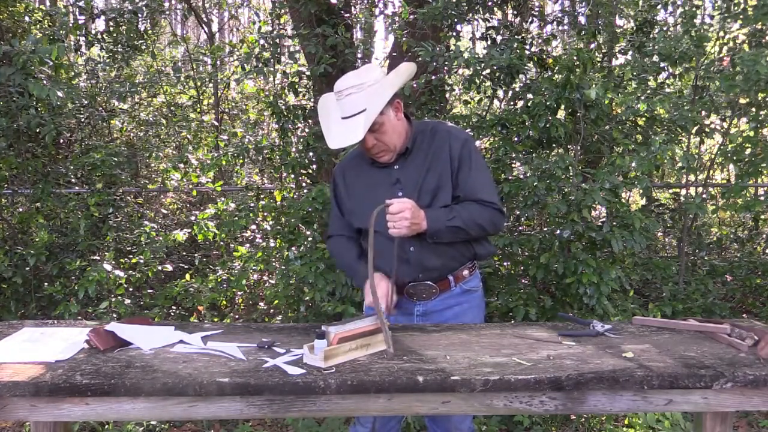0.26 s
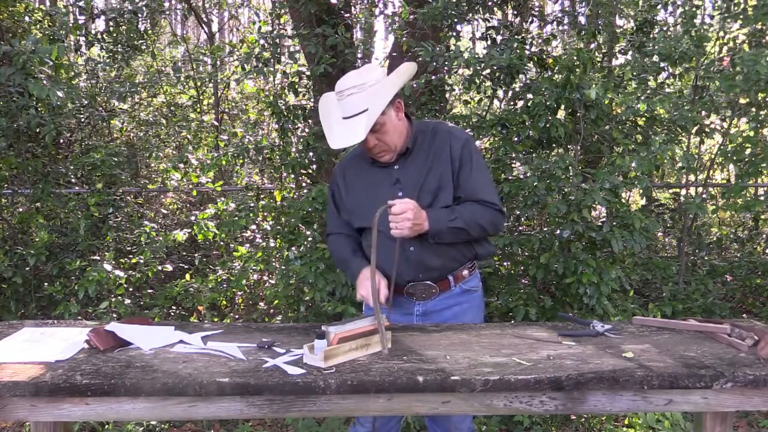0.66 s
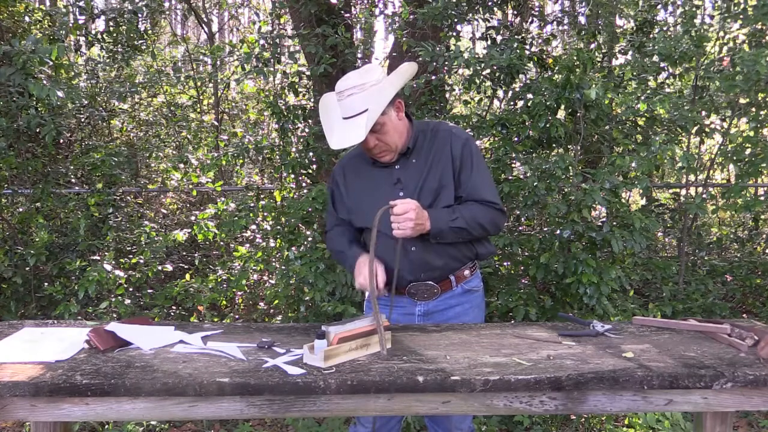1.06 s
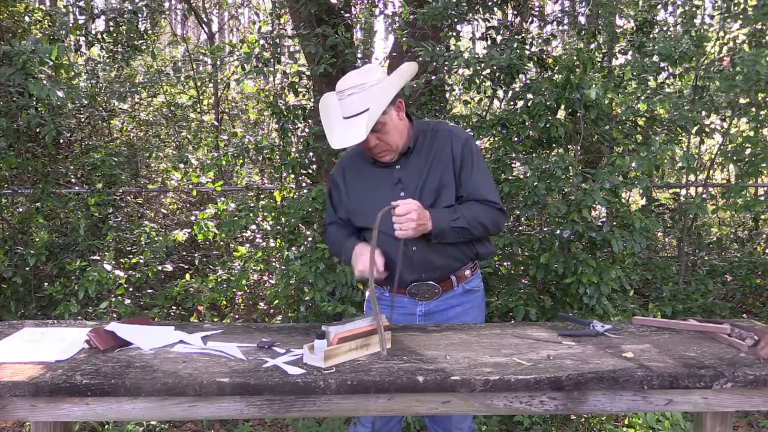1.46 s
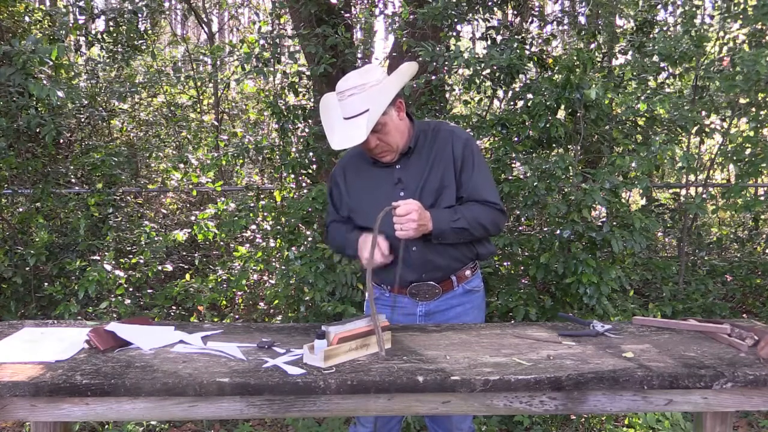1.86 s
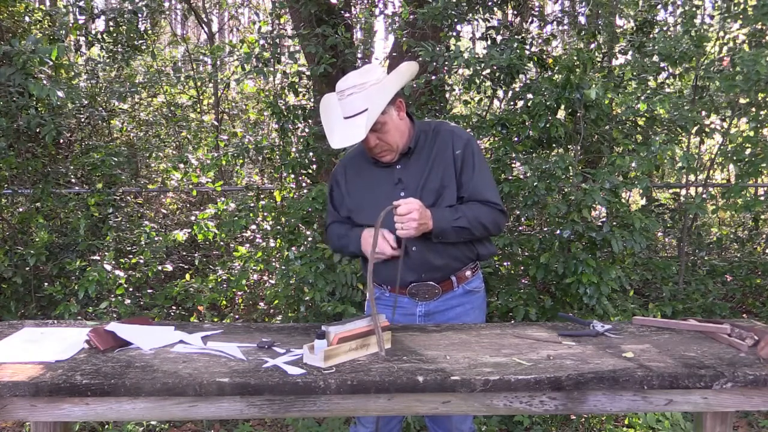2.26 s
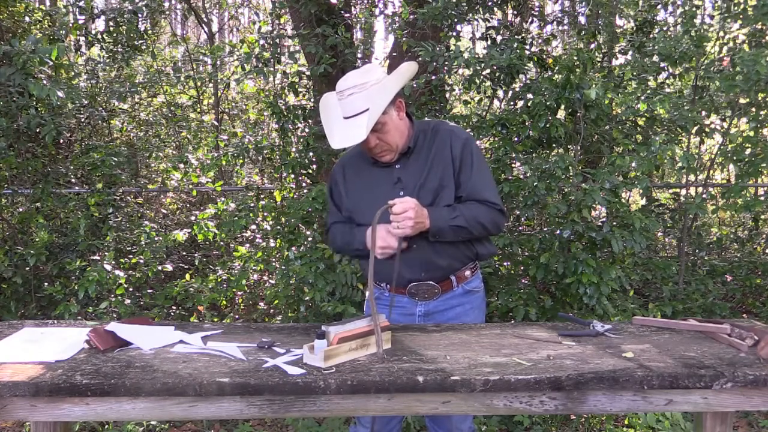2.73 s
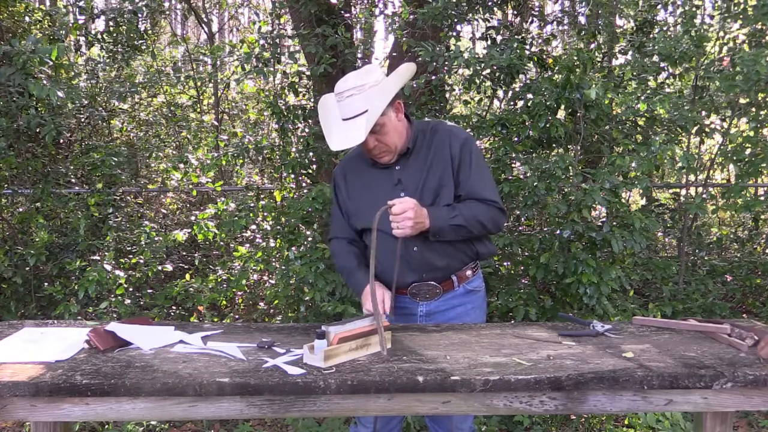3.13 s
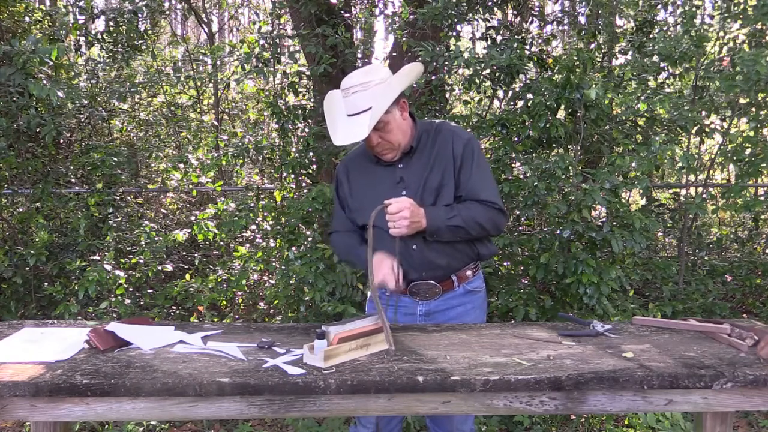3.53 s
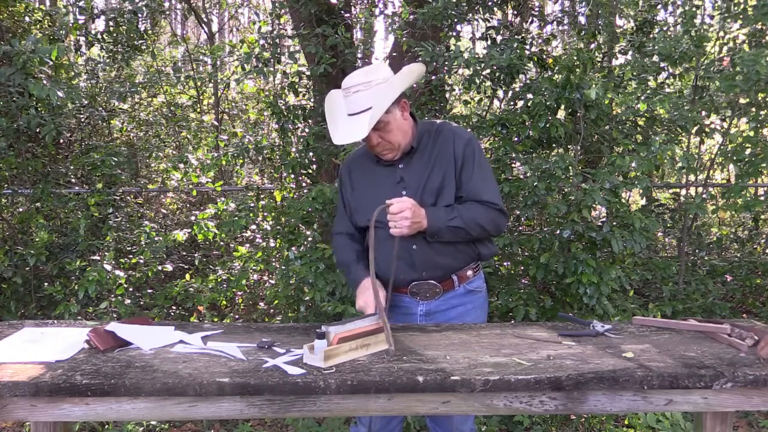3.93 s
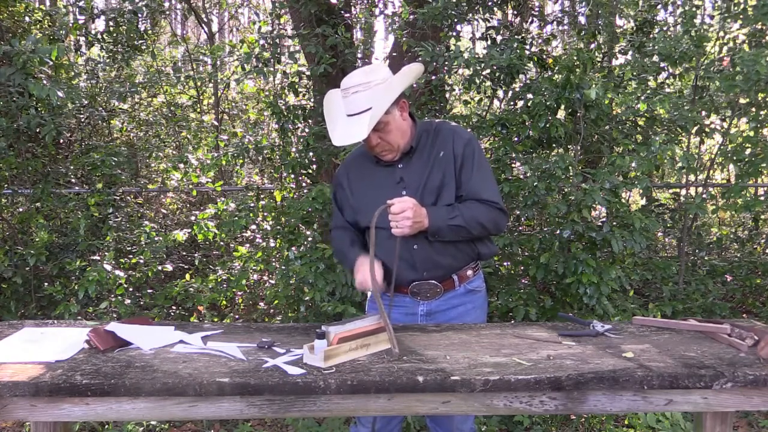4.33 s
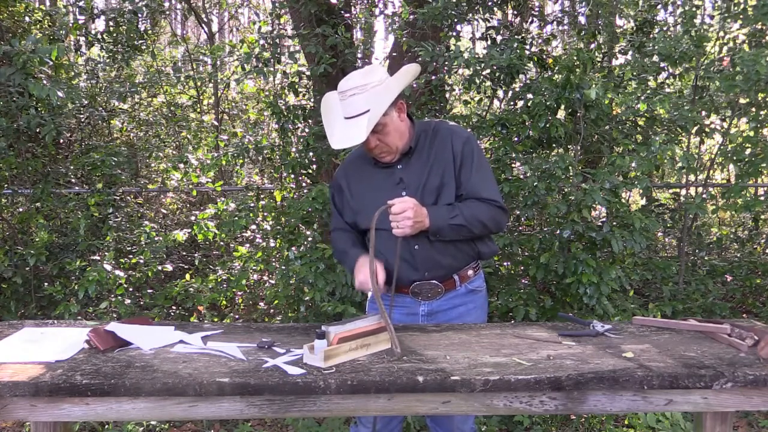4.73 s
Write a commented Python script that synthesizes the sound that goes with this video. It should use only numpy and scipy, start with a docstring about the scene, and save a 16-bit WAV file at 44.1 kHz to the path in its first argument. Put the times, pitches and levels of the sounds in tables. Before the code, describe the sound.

Quick hissing knife strokes on taut leather, with crisp slaps at the turns and faint birdsong behind.

```python
"""Stropping a knife by a wood

A blade hisses along a taut leather strap and slaps it at each turn; the strap tugs a wooden bench.
Birds sing among echoing trees, over leaf hiss and a low drone. The small microphone is lopsided:
each loud treble burst shifts its rest point and comes out as a soft thump."""
import sys
import numpy as np
from scipy import signal
from scipy.fft import rfft, irfft
from scipy.io import wavfile
from scipy.ndimage import uniform_filter1d

SR = 44100
rng = np.random.default_rng(int(sys.argv[2]) if len(sys.argv) > 2 else 0)


def persist_wave(psi):
    """Save psi, clipped to +-1, as 16-bit WAV."""
    counts = np.round(np.clip(psi, -1, 1) * 32767).astype(np.int16)
    wavfile.write(sys.argv[1], SR, np.atleast_2d(counts).T)


N = 220279

# blade meets strap: t/s, level of first 4 ms/dB, bright resonance/Hz, chatter/ms
CONTACTS = [(0.3096, -64, 3760, 2.6), (0.3621, -52, 1750, 1.1), (0.4929, -31, 3600, 3.5),
            (0.82, -53, 1690, 0.89), (0.9543, -27, 4900, 2.7), (1.264, -52.5, 1650, 0.75),
            (1.3609, -26.5, 2800, 1.9), (1.7407, -53.5, 2730, 3), (1.8361, -27, 6050, 4.15),
            (2.15, -55.5, 3780, 2.7), (2.179, -39, 5500, 6.7), (2.1848, -49, 3120, 2.3),
            (2.3212, -37.5, 2610, 3.5), (2.6076, -54, 1630, 1.4), (2.696, -26, 2820, 3),
            (2.836, -49, 1600, 3.2), (2.8461, -43.5, 3300, 5.2), (2.851, -41.5, 2750, 1.5),
            (3.6277, -25.5, 2700, 3.2), (4.0893, -58, 2400, 1.8), (4.507, -54.5, 4300, 1),
            (4.8938, -51.5, 4300, 1.9)]


def strokes():
    """Stick-slip: the edge hisses, the leather answers lower and squeaks at lift-off."""
    # resonances of leather and edge: f/Hz, width/Hz, level/dB
    leather_modes = [(1322, 500, -3), (1680, 300, 1.5), (2630, 310, -2), (3283, 960, 1.5), (3897, 700, -2),
                     (4606, 1000, -1.5)]
    edge_modes = [(5780, 1360, 0.5), (7630, 2100, 1.5), (9450, 1600, 9.5), (12200, 2200, -3.5),
                  (14800, 2600, -4.5)]
    hiss, body, squeak = pressure()
    slip = grains(spread_db=-1.5) * undb(0.97 * walk(120))
    drive = unit(slip)
    force = hiss / hiss.max() + 1e-9
    edge = 0
    for k, (hz, width, db) in enumerate(edge_modes):
        brightening = force ** (0.15 * np.log2(hz / 8000))  # higher modes need more pressure
        edge += (-1) ** k * undb(db + 1.9 * walk(40)) * ring(drive, hz, width) * brightening
    leather = sum(undb(db + 1.6 * walk(60)) * ring(slip, hz, width) for hz, width, db in leather_modes)
    return hiss * edge + body * unit(leather) + squeak * unit(ring(slip, hz=6630, width_hz=1280))


def pressure():
    """Each stroke swells, holds, fades and ends at lift-off. Returns hiss, body and squeak gains."""
    # blade passes: lift-off t/s, fade/s, hold/s, swell/s, hiss/dB, body re hiss/dB, squeak re hiss/dB
    passes = [(0.136, .037, 0.0066, .09, -53.5, 2.5, 2.5), (0.486, .004, 0.027, 0.077, -62.5, 4.5, -6),
              (0.622, 0.087, .012, .017, -63, -0.5, 5), (0.935, .008, 0.014, .098, -62.5, 5, -8),
              (1.07, 0.065, 0.04, 0.0044, -65.5, -2.5, -14), (1.35, .003, .006, 0.055, -69.5, 6.5, -20),
              (1.497, 0.072, 0.032, 0.0074, -59, -2.5, -17), (1.82, 0.0037, 0.005, 0.077, -62, 4.5, -1),
              (1.957, 0.075, .022, .03, -68, -4, -22), (2.309, 0.007, 0.086, 0.043, -66.5, 7.5, 1),
              (2.42, .035, .022, 0.023, -79, -2, -10), (2.68, .006, 0.019, 0.045, -69.5, 6.5, -3),
              (2.827, 0.068, .035, 0.02, -58, -3.5, -3), (3.603, 0.0053, 0.012, 0.043, -67.5, 3, 6),
              (3.803, 0.13, 0.013, 0.02, -53.5, -4.5, -2), (4.279, 0.0094, 0.063, 0.1, -57.5, 2.5, 5.5),
              (4.69, 0.047, 0.034, 0.11, -54, 2.5, 8), (5.0, .004, .008, 0.076, -66, 8.5, -1)]
    swell_db_per_s, fade_db_per_s, touch_s = 209, 270, 0.0041
    squeak_s, squeak_floor_db = 0.027, -8
    gains = np.zeros((3, N))
    for lift, fade, hold, swell, db, body_db, squeak_db in passes:
        left_s = np.arange(fade + hold + swell, 0, -1 / SR)
        gate = np.clip(np.minimum(left_s[0] - left_s, left_s) / touch_s, 0, 1)
        drop_db = swell_db_per_s * np.maximum(left_s - fade - hold, 0)
        drop_db += fade_db_per_s * np.maximum(fade - left_s, 0)
        body_drop_db = 0.65 * drop_db
        lift_db = np.interp(left_s, [squeak_s, 1.17 * squeak_s], [squeak_db, squeak_floor_db])
        for row, gain_db in zip(gains, (-drop_db, body_db - body_drop_db, lift_db - body_drop_db)):
            add(row, lift - left_s[0], gate * undb(db + gain_db))
    return gains


def slaps():
    """Impact and brief chatter ring the blade; softer contacts are duller."""
    # blade resonances: f/Hz, width/Hz, level/dB
    blade_modes = [(1175, 550, -13), (1760, 550, -6.5), (2800, 1550, 4.5), (4320, 1530, 5.5),
                   (5570, 3500, 6.5), (6270, 510, -19), (8020, 5900, -1.5), (9340, 2500, -16.5),
                   (11330, 460, -9), (13800, 720, -3.5), (15400, 500, -31)]
    soft_hard_db = [-46.5, -33.5]
    out, t = np.zeros(N), np.arange(1200) / SR
    noises = grains(spread_db=3.5, shape=(len(CONTACTS), len(t)))
    for (start, db, bright_hz, chatter_ms), noise in zip(CONTACTS, noises):
        tilt_db_per_oct = np.interp(db, soft_hard_db, [-14.5, 0])
        top_hz = np.interp(db, soft_hard_db, [6800, 17800])
        attack = 1 - np.exp(-t / 0.00036)
        impact = np.exp(-t / 0.00054)
        chatter = 0.67 * np.exp(-np.maximum(t - chatter_ms / 1000, 0) / 0.0017)
        push = noise * attack * (impact + chatter)
        hit = ring_modes(push, blade_modes, tilt_db_per_oct, pivot_hz=4000)
        hit += undb(4.5) * ring(push, bright_hz, 0.25 * bright_hz)
        hit = signal.lfilter(*signal.butter(3, top_hz, fs=SR), hit)
        add(out, start, undb(db) * hit / np.sqrt(np.mean(hit[:180] ** 2)))
    return out


def bench():
    """The wood's modes carry rattling knocks, a creak under each stroke and a shake after each slap."""
    # strap knocks its anchor: t/s, peak/dB
    anchor_knocks = [(0.66, -50.5), (1.115, -51.5), (1.531, -43.5), (1.581, -49.5), (2.156, -48),
                     (2.404, -55), (2.633, -55), (2.808, -49.5), (2.86, -45), (2.889, -48.5),
                     (2.952, -54.5), (3.383, -63), (3.809, -42), (4.222, -53), (4.573, -48.5)]
    # wood resonances: f/Hz, width/Hz, level/dB
    wood_modes = [(161, 45, 4), (300, 74, 5.5), (493, 93, -1.5), (604, 230, -3.5), (846, 240, -14.5)]
    rattle_s, jolt_t60_s, sway_t60_s = 0.017, 0.43, 0.95
    rest_db, pull_db, slap_knock_db, jolt_db, sway_db = -80.5, -13.5, -17, -26.5, -41
    out, t = np.zeros(N), np.arange(4000) / SR
    knocks = anchor_knocks + [(start, db + slap_knock_db) for start, db, *_ in CONTACTS]
    for start, db in knocks:
        push = np.exp(-t / 0.00029) + 0.24 * rng.standard_normal(len(t)) * np.exp(-t / rattle_s)
        knock = ring_modes(push, wood_modes, tilt_db_per_oct=2.5)
        add(out, start, undb(db) * knock / np.max(np.abs(knock)))
    shake = undb(rest_db) + undb(pull_db) * pressure()[1]
    t = np.arange(SR) / SR
    for start, db, *_ in CONTACTS:
        add(shake, start, undb(db + jolt_db) * (1 - np.exp(-t / 0.013)) * 1000 ** (-t / jolt_t60_s))
        add(shake, start, undb(db + sway_db) * 1000 ** (-t / sway_t60_s))
    slip = grains(spread_db=2.5) * undb(2.5 * walk(70))
    return out + shake * unit(ring_modes(slip, wood_modes))


def songbird():
    """One bird repeats a whistled four-note phrase."""
    # one contour per note: t in phrase/s, f/Hz, level/dB
    contours = [
        [(-.046, 2940, -22), (-.042, 3980, -2), (-.036, 3710, -2), (-.026, 2750, -5)],
        [(0, 2136, 1), (.008, 2770, 6), (.014, 3060, 13.5), (.026, 3145, -1), (.032, 3070, -24)],
        [(.07, 1476, -38), (.082, 1683, -2.5), (.105, 1590, -10.5), (.125, 1580, -18)],
        [(.143, 2118, -13.5), (.159, 2346, 2.5), (.179, 2411, -1.5), (.195, 2637, -7.5), (.213, 2730, 2),
         (.225, 2714, -3)],
    ]
    # phrases: t/s, note spacing factor, note length factor, levels of notes 1-4/dB
    phrases = [(1.207, .93, 1.1, -63.5, -66, -63, -57.5), (1.532, 0.99, 1, -57, -63, -62, -54.5),
               (1.858, 0.98, 1.12, -57, -64, -64, -54.5), (2.185, 0.98, 1.12, -58.5, -64.5, -61.5, -55),
               (2.512, 1.08, 1.1, -58, -62.5, -62, -55.5), (2.848, 0.91, 1.07, -57.5, -64, -85, -90)]
    out = np.zeros(N)
    for start, spacing, stretch, *levels_db in phrases:
        for contour, level_db in zip(contours, levels_db):
            times, hz, db = np.transpose(contour)
            add(out, start + spacing * times[0], whistle(stretch * times, hz, db + level_db))
    return out


def bird_calls():
    """Harsh rising chips and scattered glides. Returns direct sound and what reaches the trees."""
    # second bird's chips: t/s, top f/Hz, direct/dB, echo/dB
    chips = [(.01, 7140, -59.5, -54), (.228, 7600, -68, -69), (0.762, 7250, -58.5, -54),
             (1.475, 5980, -65, -67), (1.665, 7680, -53, -54), (2.131, 6130, -65, -66),
             (2.2, 7220, -59, -51.5), (2.457, 6080, -64, -67), (3.052, 7260, -55.5, -55),
             (3.556, 7250, -58, -81), (4.471, 7200, -57, -56)]
    # gliding notes: t/s, length/s, start f/Hz, end f/Hz, direct/dB, echo/dB
    notes = [(0.182, 0.044, 3510, 3270, -91, -74.5), (0.259, 0.076, 2473, 2970, -97, -71),
             (0.583, .11, 2440, 2970, -90, -68), (0.972, 0.055, 2625, 3110, -93, -67),
             (2.528, .018, 3690, 3460, -58.5, -73), (2.531, .0083, 5260, 5070, -71, -69),
             (2.566, 0.03, 3600, 3540, -64, -75), (3.812, 0.045, 7600, 7350, -70, -74),
             (4.687, .12, 3480, 3180, -90, -71.5)]
    chip_s = 0.0114
    calls = [(start, glide(chip_s, 0.75 * hz, hz, depth=0.51), *dbs) for start, hz, *dbs in chips]
    for start, length_s, from_hz, to_hz, *dbs in notes:
        calls.append((start, glide(length_s, from_hz, to_hz, depth=0.44), *dbs))
    direct, far = np.zeros(N), np.zeros(N)
    for start, note, direct_db, echo_db in calls:
        add(direct, start, undb(direct_db) * note)
        add(far, start, undb(echo_db) * note)
    return direct, far


def glide(length_s, from_hz, to_hz, depth, warble_hz=452):
    """A sliding note, roughened by a fast amplitude warble."""
    bend_hz = 0.35 * from_hz + 0.65 * to_hz
    note = whistle([0, 0.61 * length_s, length_s], [from_hz, bend_hz, to_hz], [-3, 0, -3])
    return note * (1 + depth * np.cos(2 * np.pi * warble_hz * np.arange(len(note)) / SR))


def whistle(times_s, hz, db):
    """A soft-ended sine through pitch and level points."""
    t = np.arange(times_s[0], times_s[-1], 1 / SR)
    ends = np.clip(np.minimum(t - times_s[0], times_s[-1] - t) / 0.00099, 0, 1)
    phase = 2 * np.pi * np.cumsum(np.interp(t, times_s, hz)) / SR
    return np.sqrt(2) * ends * undb(np.interp(t, times_s, db)) * np.sin(phase)


def trees(x, t60_s=0.54, rise_s=0.013):
    """Scattered trunks return echoes that die away."""
    t = np.arange(int(1.2 * SR)) / SR
    tail = grains(spread_db=2.1, shape=len(t)) * 1000 ** (-t / t60_s) * np.clip(t / rise_s, 0, 1)
    return signal.fftconvolve(x, tail / np.sqrt(np.sum(tail ** 2)))[:N]


def air():
    """Leaf and microphone hiss, a far drone of wandering level and a low hum that comes and goes."""
    # hiss spectrum: f/Hz, relative density/dB
    spectrum = [(15, -42), (25, -6.5), (65, -4), (202, -14), (349, -15), (787, -19), (854, -20),
                (2900, -26.5), (6210, -28.5), (15200, -33.5), (16500, -38)]
    # hum swells: t/s, length/s, level/dB
    swells = [(0.0, 0.17, -62), (1.2, 0.095, -71), (2.41, 0.31, -60.5)]
    drone = unit(ring(rng.standard_normal(N), hz=75.6, width_hz=55)) * undb(-75.5 + 2.5 * walk(6.7))
    hum_gain = np.zeros(N)
    for start, length_s, db in swells:
        add(hum_gain, start, undb(db) * np.hanning(int(length_s * SR)) ** 0.5)
    hum = hum_gain * unit(ring(rng.standard_normal(N), hz=83, width_hz=15))
    hz, density_db = np.transpose(spectrum)
    bins_hz = np.fft.rfftfreq(N, 1 / SR) + 1
    colour = undb(np.interp(np.log(bins_hz), np.log(hz), density_db))
    hiss = unit(irfft(rfft(rng.standard_normal(N)) * colour, N))
    return undb(-65) * hiss + drone + hum


def grains(spread_db, shape=N):
    """Gritty noise: each sample has a long-tailed random size."""
    return rng.standard_normal(shape) * undb(spread_db * rng.exponential(size=shape))


def walk(rate_hz):
    """Slewed random steps; spread near 1."""
    hold = int(SR / rate_hz)
    steps = np.repeat(rng.standard_normal(N // hold + 1), hold)
    return 1.35 * uniform_filter1d(steps, hold)[:N]


def ring_modes(x, modes, tilt_db_per_oct=0, pivot_hz=400):
    """Parallel resonances, levels tilted about a pivot."""
    return sum(undb(db + tilt_db_per_oct * np.log2(hz / pivot_hz)) * ring(x, hz, width)
               for hz, width, db in modes)


def ring(x, hz, width_hz):
    """Steep resonance, gain 1 at its centre."""
    b, a = signal.iirpeak(hz, hz / (1.5 * width_hz), fs=SR)
    return signal.lfilter(b, a, signal.lfilter(b, a, x))


def one_pole(x, hz):
    return signal.lfilter(*signal.butter(1, hz, fs=SR), x)


def highpass(x, hz, order):
    return signal.sosfilt(signal.butter(order, hz, "high", fs=SR, output="sos"), x)


def add(out, start_s, x):
    i = int(start_s * SR)
    x, i = x[max(-i, 0):], max(i, 0)
    out[i:i + len(x)] += x[:len(out) - i]


def undb(db):
    return 10 ** (np.asarray(db) / 20)


def unit(x):
    return x / np.sqrt(np.mean(x ** 2))


def scene():
    """Knife, bench, birds and air, nearly mono with a faint stereo spread."""
    bench_echo_s = 0.0021
    knife = strokes() + slaps()
    knife += undb(-19) * np.roll(knife, int(bench_echo_s * SR))
    wood = bench()
    song = songbird()
    calls, far_calls = bird_calls()
    echoes = trees(undb(-6) * song + far_calls + undb(-30.5) * knife)
    mid = knife + wood + song + calls + echoes + air()
    side = undb(-33.5) * air() + undb(-43) * np.gradient(knife) + undb(-52) * np.roll(wood, 200)
    return np.array([mid + side, mid - side])


def record(dry):
    """Treble swings shift the capsule's rest point one way; the low cut turns the shift into a thump."""
    shift_gain, low_cut_hz, mismatch, top_hz = 5.07, 24.7, 0.019, 15900
    swing = np.abs(highpass(dry, hz=1000, order=2))
    shift = shift_gain * one_pole(one_pole(swing - np.median(swing), hz=23.6), hz=160)
    cuts_hz = low_cut_hz * (1 + mismatch), low_cut_hz * (1 - mismatch)
    channels = [highpass(x, hz, order=3) for x, hz in zip(dry + shift, cuts_hz)]
    return signal.sosfilt(signal.ellip(10, 0.2, 60, top_hz, fs=SR, output="sos"), channels)


dry = scene()
out = record(dry)
persist_wave(out)
```